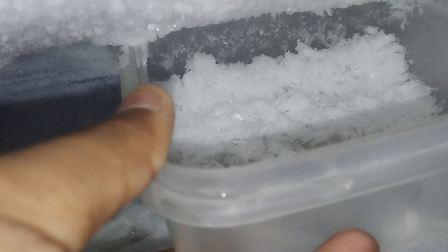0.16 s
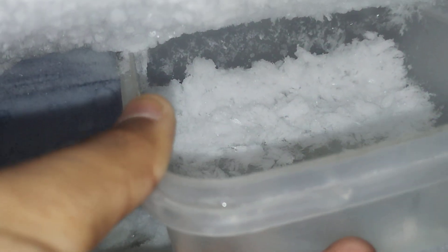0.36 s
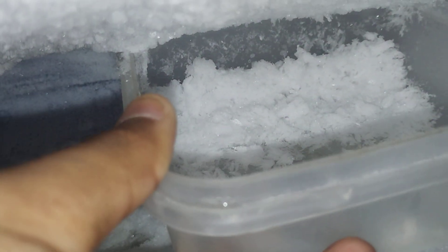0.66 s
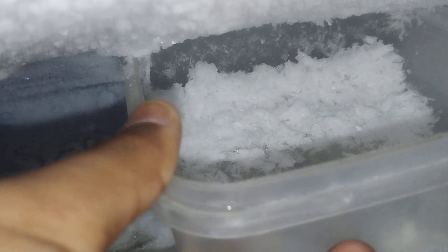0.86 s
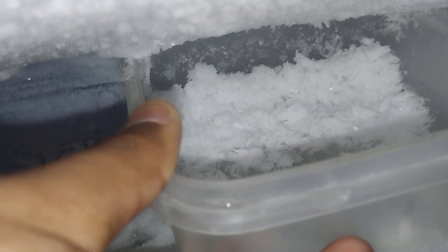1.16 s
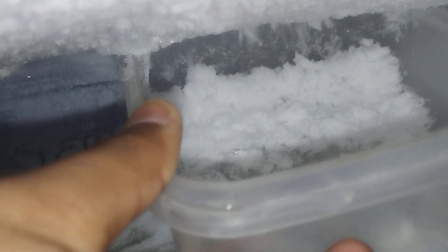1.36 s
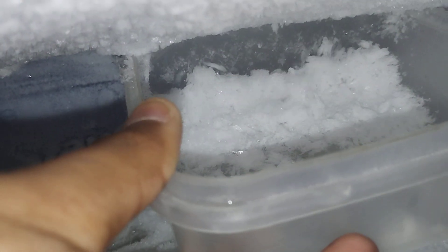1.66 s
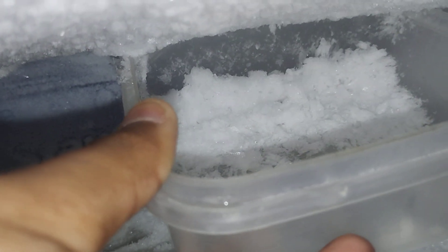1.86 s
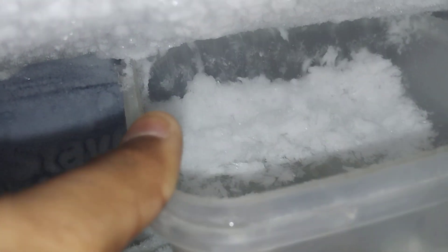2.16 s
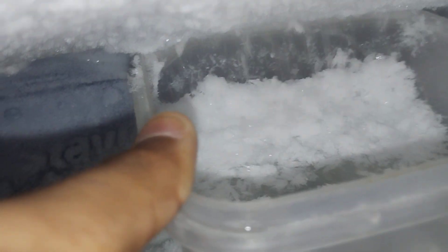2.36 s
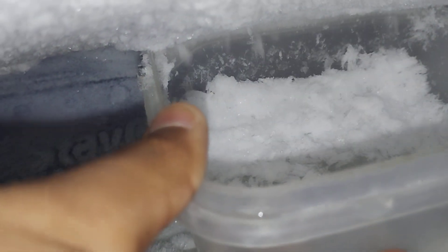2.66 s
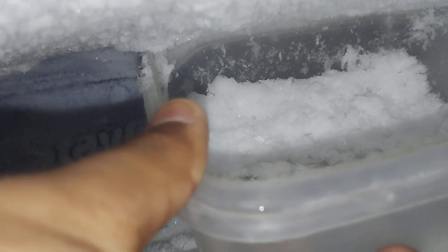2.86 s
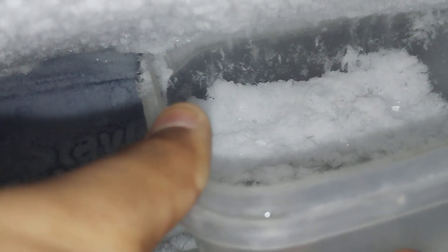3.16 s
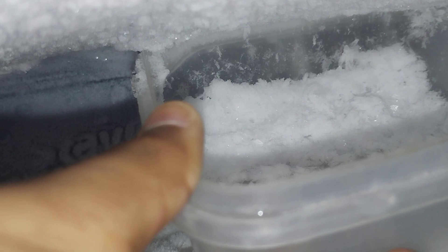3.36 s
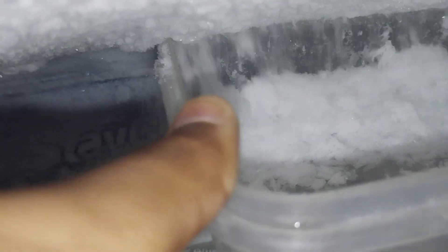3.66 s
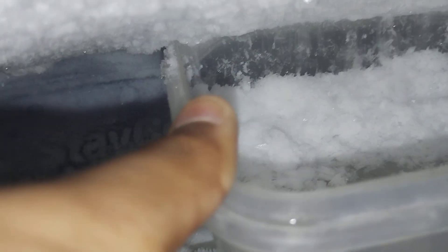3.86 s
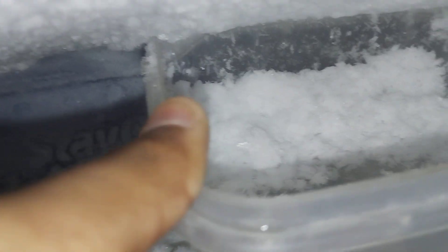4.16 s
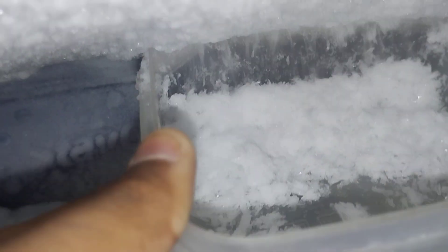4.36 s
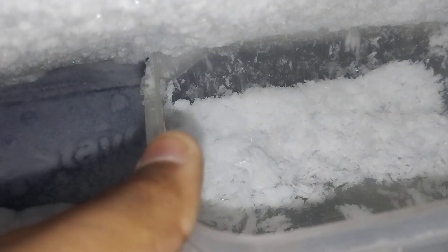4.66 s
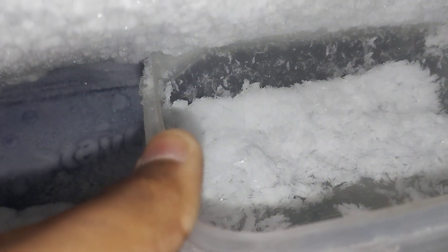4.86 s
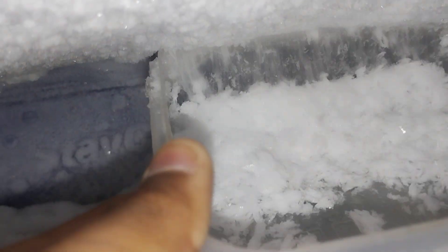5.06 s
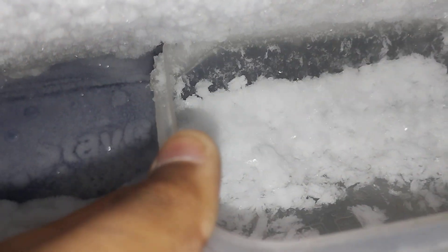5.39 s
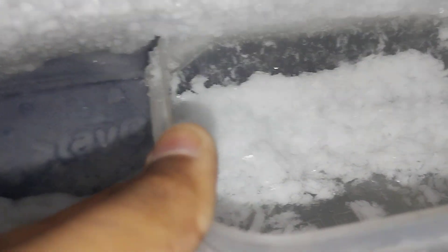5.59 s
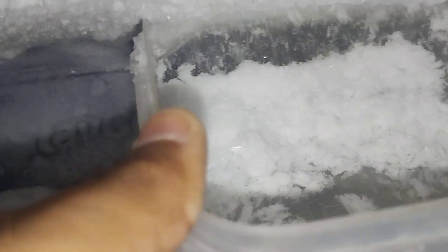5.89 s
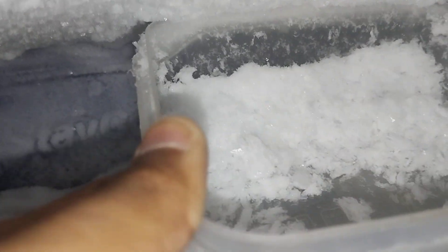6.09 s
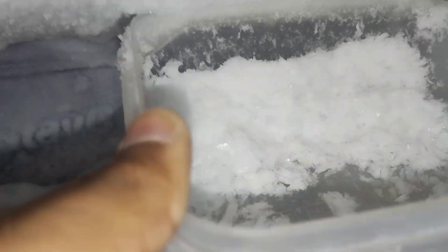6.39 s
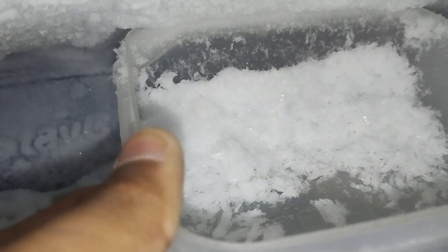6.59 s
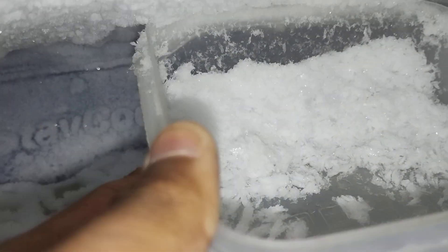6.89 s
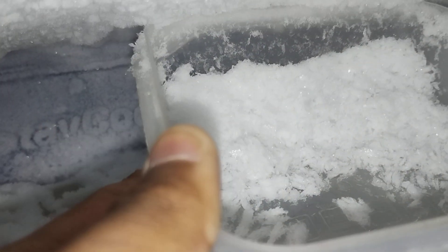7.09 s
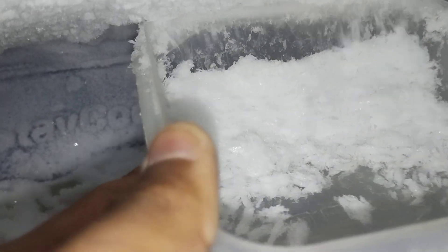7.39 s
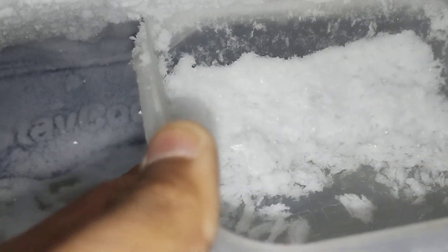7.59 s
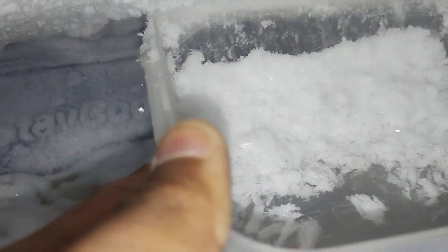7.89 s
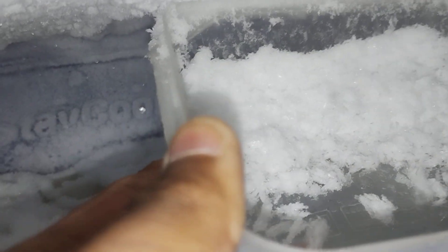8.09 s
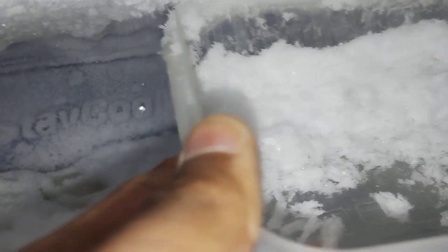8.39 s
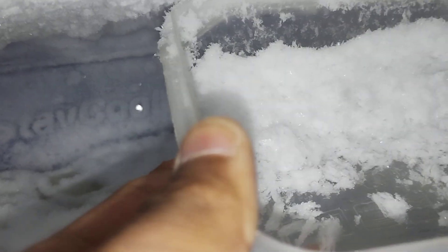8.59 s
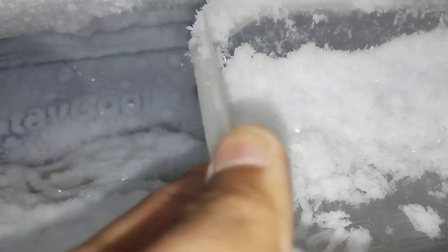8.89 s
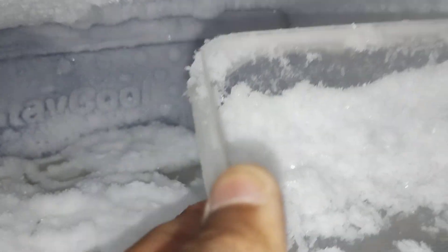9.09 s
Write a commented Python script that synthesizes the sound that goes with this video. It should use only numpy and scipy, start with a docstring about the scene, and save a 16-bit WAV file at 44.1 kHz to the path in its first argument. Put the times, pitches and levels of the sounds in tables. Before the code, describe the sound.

Close, gritty bursts of frost scraping with a hollow plastic container, sharp ice snaps and dull knocks, a brief dropout, then lighter scrapes.

```python
"""The rim of a plastic tub is pushed in quick strokes through thick frost on a freezer wall, close by. The rim
sticks and slips: small uneven slips make the tub ring hollow, the wall thud and ice crystals crunch. It slips
off single lumps of ice with a crack and a ring, crumbs tick, and one heavy shove makes the wall boom. Short
echoes and a faint noise tail surround it; steady tones and soft noise make the freezer's hum and the air. The
sound cuts out for a moment; the loudest peaks are held just below full scale."""
import sys
import numpy as np
from scipy import signal
from scipy.fft import rfft, irfft, next_fast_len
from scipy.io import wavfile
from scipy.ndimage import uniform_filter1d

SR = 44100
rng = np.random.default_rng(int(sys.argv[2]) if len(sys.argv) > 2 else 0)


def wav_record(signal):
    """Record a signal, one row per channel, as 16-bit PCM in the file named by sys.argv[1]."""
    frames = np.transpose(np.atleast_2d(signal))
    bounded = np.clip(frames, -1, 1)
    # unit amplitude maps onto the largest positive 16-bit level
    quanta = np.round(bounded * 32767).astype(np.int16)
    wavfile.write(sys.argv[1], SR, quanta)


N = 407476
T = np.arange(N) / SR  # time of every sample [s]

# Levels in the tables are relative; the functions add their own trims.
# hum and faint whine of the freezer: (frequency [Hz], level [dB])
HUM_TONES = [(96.9,-60),(145.3,-62),(294,-80.5),(344.5,-76.5),(468,-75),(538,-76.5),(2620,-83.5),(7079,-88.5),(9507,-93),(10250,-101.5),(12300,-99)]
# strength of the hum, louder while the tub is pressed on the wall: (time [s], level [dB])
HUM_STRENGTH = [(0,0),(1.2,-1.5),(2.0,10),(3.0,11.5),(4.5,16),(5.3,6),(5.8,12.5),(6.35,13),(6.6,0.5),(7.2,6),(8.4,14),(8.8,11.5),(9.05,-0.5)]
# colour of the room air: (frequency [Hz], level per Hz [dB])
AIR_COLOUR = [(30,-15.5),(70,-1.5),(110,-4.5),(220,-24.5),(470,-13.5),(970,-23.5),(2560,-23.5),(6400,-28),(8000,-32),(12000,-34.5),(15500,-45.5)]
# strength of the room air: (time [s], level [dB])
AIR_STRENGTH = [(0,-58.5),(0.3,-61),(1.2,-65),(2.0,-57),(6.7,-59),(9.24,-63)]
# tail of the room: (frequency [Hz], level [dB], time to fall by 60 dB [s])
ROOM_TAIL = [(100.3,-14.5,2.2),(300,-20.5,0.45),(644,-19.5,0.75),(1510,-16.5,1.1),(4030,-24.5,0.74),(12000,-38,.4)]
# the two microphone ports: (frequency [Hz], lead of the left [radians], left minus right [dB])
MIC_PORTS = [(100,.1,0),(300,0.52,3),(585,0.3,5),(810,0.53,-5),(1018,1.65,-2),(1360,2.77,0.5),(2470,7.86,-2.5),(4200,8.55,-5.5),(7770,21.2,-2),(16300,69,0)]
# starts of three grips, in order rim flat on the wall, rim digging in, light touch: (time [s])
GRIP_STARTS = [0, 2.92, 6.9]
# ringing notes (modes) of the tub:
# (frequency [Hz], width [Hz], flat level [dB], digging level [dB], light level [dB])
TUB_MODES = [(604.8,62,-2,1,13),(656.4,104,4,0,7.5),(769,91,0,-4,2),(908,140,-5,-7.5,0),(940,583,-15.5,-13,0),(1160,500,-19,-19.5,-0.5)]
# ringing notes (modes) of the freezer wall:
# (frequency [Hz], width [Hz], flat level [dB], digging level [dB], light level [dB])
WALL_MODES = [(126.4,17,3.5,2,4.5),(176,63,1.5,1,-2.5),(233,290,-5.5,-11,-11),(294.6,54.3,4,2.5,-2.5),(416,154,-3.5,-4,-3.5)]
# colour of breaking frost: (frequency [Hz], flat level [dB], digging level [dB], light level [dB])
FROST_COLOUR = [(715,-26,-32,-41),(1200,2.5,4,1),(2000,-5,1,-10),(2800,-9,1,-3),(4100,-9,-3.5,-3.5),(6100,-8,-3,-3),(7160,-11.5,-5,-5.5),(12000,-16,-8.5,-6),(15700,-20.5,-13,-11.5)]
# small high modes of the tub that colour the crunch: (frequency [Hz], width [Hz], lift [dB])
PLASTIC_MODES = [(1714,77,5.5),(2289,78,5.5),(2437,120,5.5),(2977,180,2),(3825,270,5.5),(4400,120,3),(4820,51,6.5),(5400,92,2.5),(5630,140,3),(9070,110,8.5)]
# the scraping edge sings higher or lower as it bends: (time [s], frequency [Hz], lift [dB])
EDGE_SONG = [(2.499, 2410, 6), (3.3, 2430, 2.5), (3.7, 5300, 5), (5.4, 5500, 4), (5.95, 4010, 5),
             (7.45, 4780, 6), (8.4, 4200, 3.5)]
# the rim slips off a lump of ice or, in the faintest rows, a single crumb ticks against the tub:
# (time [s], peak of the tub's ring [dB], crack level [dB])
SINGLE_SLIPS = [(0.3893, -32, -49.5), (1.1228, -54, -54.5), (1.25, -42, -49), (1.291, -23.5, -25.5),
                (1.377, -18.5, -32), (1.397, -12, -32.5), (1.4369, -8.5, -31), (1.4461, -9, -23),
                (1.4918, -5, -22), (1.5213, -13, -31), (1.559, -12.5, -29), (1.6313, -19, -33),
                (1.6751, -6, -20.5), (1.6931, -17.5, -24), (1.73, -14, -26.5), (2.0801, -9, -21.5),
                (2.134, -1.5, -31.5), (2.2029, -2, -17.5), (2.3176, -9, -22.5), (2.4162, -10.5, -39),
                (2.4902, -6.5, -21.5), (2.5783, -14.5, -42), (2.6204, -21.5, -41.5), (2.709, -18.5, -30.5),
                (2.723, -16, -31.5), (2.843, -23, -27.5), (2.863, -23.5, -33.5), (3.0048, -9, -30),
                (3.0232, -30, -20.5), (3.2705, -11.5, -31), (3.41, -14, -31.5), (3.5033, -19, -25),
                (3.661, -10.5, -21), (3.6691, -13.5, -10.5), (3.7222, -6.5, -36), (3.7845, -17.5, -27),
                (3.8691, -14, -27), (3.92, -6, -21.5), (3.9522, -13, -25), (3.9994, -16.5, -27.5),
                (4.0255, -13.5, -25), (4.0435, -9.5, -27.5), (4.0781, -12.5, -32), (4.146, -20.5, -33.5),
                (4.1821, -15.5, -38.5), (4.3142, -7, -24.5), (4.3443, -8, -32), (4.4201, -3.5, -30),
                (4.4979, -9, -25), (4.6768, -12.5, -25.5), (4.705, -6, -25), (4.738, -10, -21.5),
                (4.8839, -23.5, -26.5), (5.0195, -26, -32), (5.0338, -17, -25), (5.0556, -8, -25.5),
                (5.0902, -2, -22), (5.0983, -2.5, -18.5), (5.3521, -5, -19.5), (5.5755, -11.5, -24.5),
                (5.6111, -14.5, -27), (5.904, -30, -37), (5.9212, -12.5, -30), (6.0105, -10.5, -41),
                (6.3226, -37.5, -44), (6.4118, -35, -43), (6.5514, -39, -43.5), (6.66, -42, -48),
                (7.1043, -35, -35), (7.189, -25, -36), (7.2911, -24.5, -34.5), (7.3242, -23, -30),
                (7.37, -22, -30.5), (7.4338, -9, -28), (7.4739, -9, -20), (7.687, -18, -39),
                (7.7228, -9, -31), (7.8126, -16, -29), (7.9154, -9.5, -29), (8.1564, -13, -33),
                (8.293, -25, -35), (8.349, -21, -30), (8.3831, -16, -44)]
# pushes of the rim through the frost: (start [s], length [s], place of the hardest point [0-1],
# crunch level [dB], ring level [dB], thud level [dB], fineness: tilt towards the treble [dB])
PUSHES = [ (1.37, 0.17, 0.67, -34, -27.5, -29.5, 3.5), (1.629, 0.036, 0.2, -41, -36, -31.5, -2),
          (1.68, 0.067, 0.2, -39, -33, -34, -0.5), (2.078, 0.25, 0.54, -31, -21.5, -28.5, 1),
          (2.28, 0.29, 0.66, -31, -18, -28.5, 3.5), (2.58, 0.083, 0.03, -42, -32.5, -30, -2),
          (2.705, 0.19, 0, -44, -32.5, -33.5, -3), (2.974, 0.12, 0.1, -33.5, -25, -28.5, 1.5),
          (3.203, 0.18, 0.37, -32.5, -22.5, -28.5, -1), (3.49, 0.17, 0.2, -37.5, -25.5, -32.5, -2),
          (3.62, 0.13, 0.46, -22.5, -17, -22, 2), (3.778, 0.065, 0, -37.5, -33, -38.5, -0.5),
          (3.868, 0.095, 0.6, -38, -26, -31, -2.5), (4.022, 0.042, 0.16, -33.5, -23, -28.5, -0.5),
          (4.162, 0.067, 0, -36, -24.5, -28, 1.5), (4.336, 0.21, 0.25, -27.5, -17.5, -26, 0.5),
          (4.665, .108, 0.2, -33, -28.5, -30, -0.5), (4.88, 0.32, 0.67, -46, -34.5, -39, 0),
          (5.054, .128, .5, -24, -17, -25.5, 2), (5.286, 0.14, 0.8, -28.5, -20, -27.5, 2.5),
          (5.552, 0.091, 0.9, -38, -29.5, -33.5, 1.5), (5.922, 0.21, 0.39, -30, -20.5, -28.5, 2.5),
          (7.102, 0.11, 0.24, -41, -34.5, -39, -9.5), (7.32, 0.093, 0.14, -49, -38.5, -39, -10.5),
          (7.403, 0.11, 0.07, -28.5, -24, -30, -6.5), (7.68, 0.2, 0.15, -41, -29, -39.5, -9.5),
          (7.845, 0.26, 0, -37, -28, -36, -6.5), (8.115, 0.08, 0.46, -39, -33.5, -36, -8.5),
          (8.335, 0.16, 0.27, -32.5, -26.5, -32.5, -6), (8.645, 0.11, 0.36, -42, -32.5, -39, -12)]
# crunch, ring and thud around a push, one row each:
# (start below the hardest point [dB], end below it [dB], release [s])
PUSH_SHAPE = [(8.5, 8.5, 0.0061), (6.5, 6, 0.0064), (5, 4, 0.0085)]
# how firmly the rim rests on the frost between pushes: (time [s], level [dB])
DRAG_LEVEL = [(1.2, -75), (1.31, -48), (1.58, -44.5), (1.8, -58), (1.93, -51.5), (2.04, -70), (2.9, -53),
              (3.46, -44.5), (4.8, -58), (5.85, -55), (6.25, -46), (6.6, -65.5), (7.25, -60), (7.54, -45.5),
              (8.25, -53.5), (8.55, -48.5), (8.8, -52), (9.0, -62)]
# late on, the rim judders evenly along the wall: (from [s], to [s])
JUDDER_TIMES = (7.68, 8.1)
# the sound cuts out for a moment: (from [s], to [s])
SILENT_TIMES = (6.805, 7.1)

BITE_S = 0.0047  # the rim bites this fast
JUDDER_PER_S, JUDDER_DB = 21.2, 4.5  # catches a second; swing up and down [dB]
# small catches come by chance; they stand out more, the lighter the push
CATCH_PER_S, CATCH_FALL_S, CATCH_DB = 45, 0.0082, 11.5
FIRM_DB, LIGHT_DB = -35.5, -42.5  # crunch gain of a firm and of a light push
BOOM_AT_S, BOOM_DB, BOOM_HZ, BOOM_SWELL_S = 3.69, -23, 124, 0.084  # the hardest shove
TOP_LIMIT_HZ = 15800  # upper end of the sound


def amp(db):
    """Turns decibels into a plain gain."""
    return 10 ** (np.asarray(db) / 20)


def read(hz, values, at):
    """Reads a curve made of straight lines between points on a log-frequency axis."""
    return np.interp(np.log(at + 1), np.log(np.asarray(hz) + 1), values)


def over_time(table):
    """Reads a (time, dB) table as a gain for every sample."""
    return amp(np.interp(T, *np.transpose(table)))


def peak(f, hz, width_hz):
    """A bump of height one around a frequency, like the response of something that rings."""
    return 1 / (1 + (2 * (f - hz) / width_hz) ** 2)


def fading(kicks, fall_s):
    """Gives each kick a tail that dies away, falling to about a third in fall_s."""
    return signal.lfilter([1], [1, -np.exp(-1 / (fall_s * SR))], kicks)


def add(mix, s, sound):
    """Mixes a sound in at time s."""
    part = mix[..., max(round(s * SR), 0):][..., :sound.shape[-1]]
    part += sound[..., :part.shape[-1]]


def evened(x, span_s):
    """Evens out loudness by bringing the power, averaged over about span_s, to one."""
    size = max(int(span_s * SR), 8)
    power = np.atleast_2d(x ** 2).mean(0)
    power = uniform_filter1d(uniform_filter1d(power, size), size)
    return x / np.sqrt(abs(power) + 1e-14)


def convolve(x, response):
    """Lets every sample of a sound set off a response, channel by channel."""
    return signal.oaconvolve(np.atleast_2d(x), np.atleast_2d(response), axes=1)[:, :N]


def causal(gain, size=4096):
    """Makes a response of unit energy that starts at once and has this gain over frequency."""
    log_gain = np.log(gain(abs(np.fft.fftfreq(size, 1 / SR))) + 1e-4)
    # the Hilbert transform finds the phase that puts the energy as early as possible
    spectrum = np.exp(np.conj(signal.hilbert(log_gain)))
    response = np.fft.ifft(spectrum).real[:size // 2]
    return response / np.linalg.norm(response)


def background(waver=0.13, air_db=0., shared=0.33, hiss_hz=7130, hiss_width_hz=300, hiss_db=-24.0):
    """The freezer's wavering tones, and soft room-air noise with a thin high hiss in it."""
    hum = np.zeros(N)
    for hz, db in HUM_TONES:
        tone = np.sin(2 * np.pi * (hz * T + rng.random()))
        drift = np.interp(T, np.linspace(0, T[-1], num=60), rng.standard_normal(size=60))
        hum += amp(db) * np.sqrt(2) * tone * (1 + waver * drift)
    f = np.fft.rfftfreq(N, 1 / SR)
    # each port has its own noise plus a shared part
    noise = rfft(rng.standard_normal((2, N)) + shared * rng.standard_normal(N))
    air = irfft(noise * amp(read(*np.transpose(AIR_COLOUR), f)), N)
    hiss = irfft(noise * peak(f, hiss_hz, hiss_width_hz), N)
    air = amp(air_db) * air / air.std() + amp(hiss_db) * hiss / hiss.std()
    return over_time(HUM_STRENGTH) * hum + over_time(AIR_STRENGTH) * air


def room(x):
    """The room's tail: the sound is smeared over fading noise, each band dying at its own speed."""
    hz, level_db, fall_60_s = np.transpose(ROOM_TAIL)
    noise = rng.standard_normal((2, int(1.4 * SR)))
    f, t, z = signal.stft(noise, SR, nperseg=512)
    decay = amp(-60 * t / read(hz, fall_60_s, f)[:, None]) * np.minimum(t / 0.0024, 1)
    energy = (decay ** 2).sum(1, keepdims=True) * t[1] * SR
    decay *= amp(read(hz, level_db, f))[:, None] / np.sqrt(energy)
    return convolve(x, signal.istft(z * decay, SR, nperseg=512)[1])


def echoes(x, side_db=-12.0, fall_s=.012, low_hz=150, high_hz=3000):
    """Early echoes from the compartment walls: short fading noise, different at each port."""
    t = np.arange(2048) / SR
    taps = rng.standard_normal((2, len(t))) * np.exp(-t / fall_s) * (1 - np.exp(-t / 0.0012))
    band = signal.butter(1, [low_hz, high_hz], "bandpass", fs=SR, output="sos")
    taps = signal.sosfilt(band, taps / np.linalg.norm(taps[0]))
    return amp(side_db) * convolve(x, taps)


def ports(middle, ends):
    """The tub's middle reaches both ports with a phase lead between them; each rim end feeds one port."""
    size = next_fast_len(N + 4096)
    f = np.fft.rfftfreq(size, 1 / SR)
    hz, lead, left_db = np.transpose(MIC_PORTS)
    side = np.array([[.5], [-.5]])  # half of each difference goes to either port
    both = rfft(middle, size) * np.exp(1j * side * np.interp(f, hz, lead))
    heard = (both + rfft(ends, size)) * amp(side * read(hz, left_db, f))
    return irfft(heard, size)[:, :N]


def body(modes, grip):
    """How a tub or wall rings after one tap: its notes together, the narrow ones ringing longest."""
    def gain(f):
        return np.sqrt(sum((amp(db[grip]) * peak(f, hz, width)) ** 2 for hz, width, *db in modes))
    return causal(gain)


def crystal(grip):
    """The sound of one ice crystal breaking: frost colour, lifted where the plastic rings."""
    hz, *db = np.transpose(FROST_COLOUR)

    def gain(f):
        plastic_db = sum(lift * peak(f, at, width) for at, width, lift in PLASTIC_MODES)
        return amp(read(hz, db[grip], f) + plastic_db)
    return causal(gain)


def by_grip(x, responses):
    """Colours each stretch of x with the response of the grip that holds then."""
    grip = np.searchsorted(GRIP_STARTS, T, side="right") - 1
    return sum(convolve(x * (grip == k), response) for k, response in enumerate(responses))


def boom():
    """A low note of the wall swells and dies under one heavy shove."""
    t = T - BOOM_AT_S
    note = np.sin(2 * np.pi * (BOOM_HZ * t + rng.random()))
    return amp(BOOM_DB) * np.exp(-abs(t) / BOOM_SWELL_S) * note


def crumbs(per_s=40, fall_s=0.0013):
    """Loose crumbs of ice tick against the tub: short noise bursts by chance, coloured as frost."""
    sizes = amp(4 * np.minimum(rng.exponential(1, N), 3))
    ticks = fading((rng.random(N) < per_s / SR) * sizes, fall_s)
    ticks = ticks * rng.standard_normal((3, N))
    return convolve(ticks / ticks.std(), crystal(1))


def fineness(t):
    """How finely the frost splinters, passing from the middle of one push to the next."""
    middles = [row[0] + row[1] / 2 for row in PUSHES]
    return np.interp(t, middles, [row[-1] for row in PUSHES])


def wander(crunch, patchy_db=-0.2, corner_hz=4200, edge_width_hz=900):
    """The crunch drifts in colour as the rim meets other frost; fine frost is brighter, the edge sings."""
    f, t, z = signal.stft(crunch, SR, nperseg=256, noverlap=192)
    patches = uniform_filter1d(rng.standard_normal(z.shape[1:]), size=3, axis=0)
    patches = uniform_filter1d(patches, size=70, axis=1)
    tilt = (f ** 4 / (f ** 4 + corner_hz ** 4))[:, None] - .5  # from -0.5 in the bass towards 0.5
    s, hz, lift_db = np.transpose(EDGE_SONG)
    edge_db = np.interp(t, s, lift_db) * peak(f[:, None], np.interp(t, s, hz), edge_width_hz)
    z = z * amp(patchy_db * patches / patches.std() + tilt * fineness(t) + edge_db)
    return signal.istft(z, SR, nperseg=256, noverlap=192)[1][:, :N]


def single_slips(crack_db=-1.0, ring_db=0., thud_db=-17.0, rise_s=0.001, crack_s=0.0027, detune=0.034,
                 size=2048):
    """A slip off a lump, or a faint crumb tick: noise crack, short tub ring, wall push: (crunch, ring, thud)."""
    crunch, ring, thud = np.zeros((3, N)), np.zeros((1, N)), np.zeros((1, N))
    t = np.arange(size) / SR
    burst = 2 * (1 - np.exp(-t / rise_s)) * np.exp(-t / crack_s)
    grips = range(len(GRIP_STARTS))
    parts = [(crystal(g), body(TUB_MODES, g), body(WALL_MODES, g)) for g in grips]
    for s, knock_db, snap_db in SINGLE_SLIPS:
        noise = rng.standard_normal((3, size))
        ice, tub, wall = parts[np.searchsorted(GRIP_STARTS, s) - 1]
        # the pitch depends on where the tub is caught or struck
        tub = np.interp(t * (1 + detune * noise[0, 0]), t, tub)
        add(crunch, s, amp(snap_db + crack_db) * convolve(burst * noise, ice))
        add(ring, s, amp(knock_db + ring_db) * tub / abs(tub).max())
        add(thud, s, amp(knock_db + thud_db) * wall / abs(wall).max())
    return crunch, ring, thud


def catches(crunch_db):
    """Gain of small chance catches: a light push stutters, a firm one grinds evenly."""
    kicks = (rng.random(N) < CATCH_PER_S / SR) * rng.uniform(0.2, 1, N)
    jolt = np.minimum(fading(kicks, CATCH_FALL_S), 1)
    light = np.clip((crunch_db - FIRM_DB) / (LIGHT_DB - FIRM_DB), 0, 1)
    depth = light * amp(CATCH_DB)
    return (1 + depth * jolt) / (1 + depth * jolt.mean())


def judder():
    """Gain of the even catching and letting go of the rim."""
    start, end = JUDDER_TIMES
    swing = np.cos(2 * np.pi * JUDDER_PER_S * (T - start))
    return amp(JUDDER_DB * swing * ((T > start) & (T < end)))


def stroke_gains():
    """Crunch, ring and thud gains: each push bites, swells to its hardest point, eases and lets go."""
    gains = np.zeros((3, N))
    start_db, end_db, release_s = np.transpose(PUSH_SHAPE)[:, :, None]
    for start, length, crest, *level_db, _ in PUSHES:
        t = np.arange(0, length + 10 * release_s.max(), 1 / SR)
        along = np.minimum(t / length, 1)  # 0 to 1 through the push
        crest = np.clip(crest, .05, .95)
        before_db = start_db * (1 - along / crest) ** 2
        after_db = end_db * ((along - crest) / (1 - crest)) ** 2
        sag_db = np.where(along < crest, before_db, after_db)
        gate = np.minimum(t / BITE_S, 1) * np.exp(-np.maximum(t - length, 0) / release_s)
        add(gains, start - BITE_S / 2, gate * amp(np.array(level_db)[:, None] - sag_db))
    # crunch and ring stutter, the thud stays smooth
    gains[:2] *= judder() * catches(20 * np.log10(gains[0] + 1e-9))
    return gains


def stick_slip(per_s=420):
    """Small slips of the rim at uneven intervals, with uneven sizes."""
    sizes = amp(3 * np.clip(rng.standard_normal(N), -2, 2))
    return (rng.random(N) < per_s / SR) * sizes


def shatter(slips, steady=1.0, spread_db=2.5):
    """Each slip breaks a burst of crystals over steady fine grinding, at three places along the rim."""
    bursts = evened(fading(slips, .0016), .05)
    breaks = (rng.random((3, N)) < 14000 / SR) * rng.choice([-1, 1], (3, N))
    sizes = amp(spread_db * np.minimum(rng.exponential(1, (3, N)), 4))
    return breaks * sizes * (bursts + steady)


def scraping(crunch_db=2.5, ring_db=-0.5, thud_db=1.0, grind=0.4, drag_db=-8.5, drag_ring_db=3.5,
             drag_thud_db=5.0, crumbs_db=-13.0):
    """Slips and breaking frost drive the air, the tub and the wall: (crunch, ring, thud)."""
    slips = stick_slip()
    grains = shatter(slips)
    force = evened(slips - slips.mean(), 0.012) + grind * evened(grains[0], 0.055)
    grips = range(len(GRIP_STARTS))
    drag = over_time(DRAG_LEVEL)
    drag_gains = drag * amp([[drag_db], [drag_ring_db], [drag_thud_db]])
    crunch, ring, thud = np.hypot(stroke_gains(), drag_gains)
    frost = evened(by_grip(grains, [crystal(g) for g in grips]), 0.042)
    frost = amp(crunch_db) * crunch * frost
    tub = evened(by_grip(force, [body(TUB_MODES, g) for g in grips]), 0.048)
    tub = amp(ring_db) * ring * tub
    # the gain comes before the wall, so the wall rings on after the stroke
    wall = by_grip(thud * evened(force, 0.011), [body(WALL_MODES, g) for g in grips])
    return frost + amp(crumbs_db) * drag * crumbs(), tub, amp(thud_db) * wall


def scene(middle_share=0.28):
    """The scraping inside the compartment, its echoes, its tail in the room, and the background."""
    crunch, ring, thud = (steady + single for steady, single in zip(scraping(), single_slips()))
    crunch = wander(crunch)
    share = np.clip(middle_share, 0, 1)
    middle = ring + thud + boom() + np.sqrt(share) * crunch[:1]
    near = ports(middle, np.sqrt(1 - share) * crunch[1:])
    return near + echoes(near) + room(near) + background()


def record(dry, low_cut_hz=88, order=4):
    """The microphone drops the deep bass; the sound cuts out briefly; peaks are held below full scale; then the
    band limit."""
    low_cut = signal.butter(order, low_cut_hz, "highpass", fs=SR, output="sos")
    sound = signal.sosfilt(low_cut, dry)
    live = 1. * ((T < SILENT_TIMES[0]) | (T > SILENT_TIMES[1]))
    live = uniform_filter1d(live, size=100)  # softens the edges of the gap
    sound = np.clip(sound * live, -.88, .88)
    lowpass = signal.firwin(511, TOP_LIMIT_HZ, window=("kaiser", 9), fs=SR)
    return signal.oaconvolve(sound, lowpass[None], "same")


dry = scene()
out = record(dry)
wav_record(out)
```